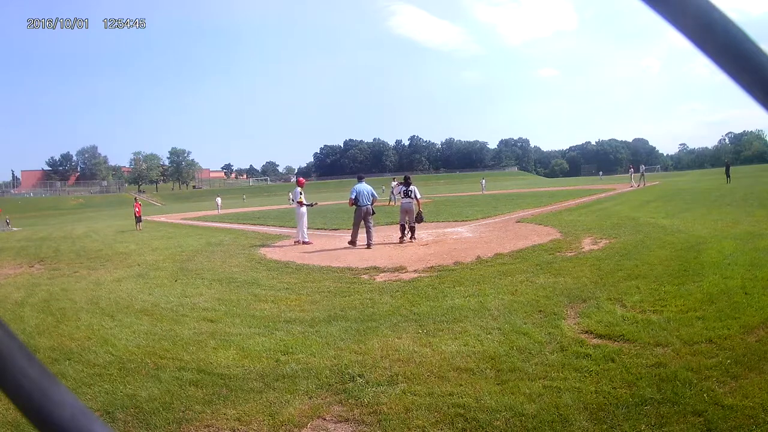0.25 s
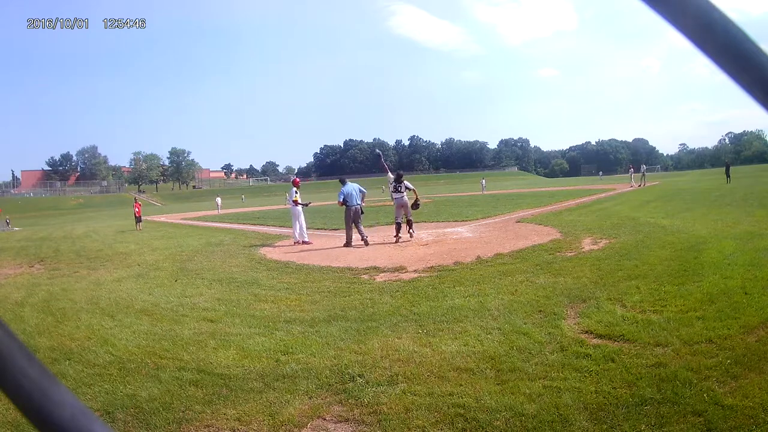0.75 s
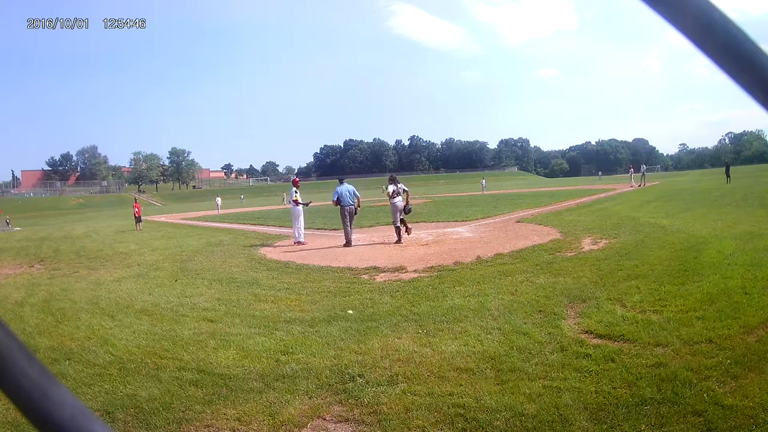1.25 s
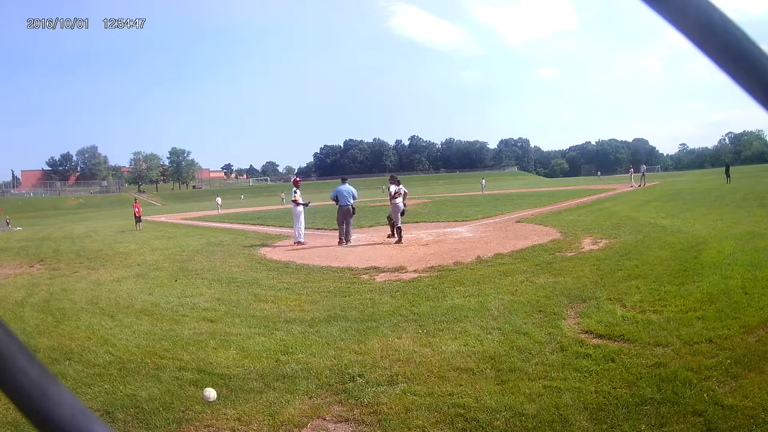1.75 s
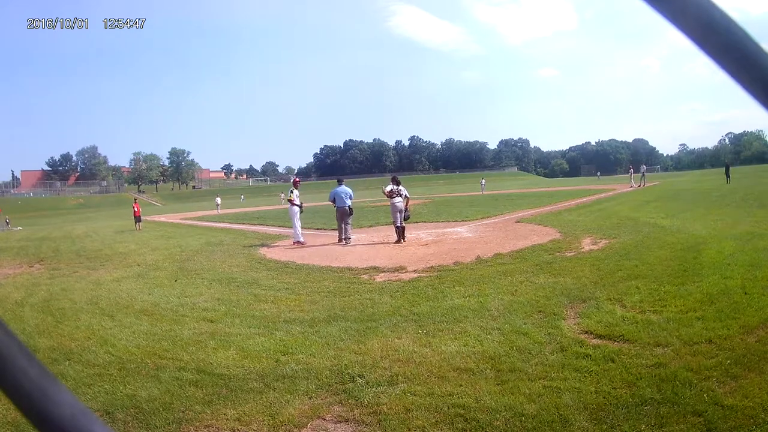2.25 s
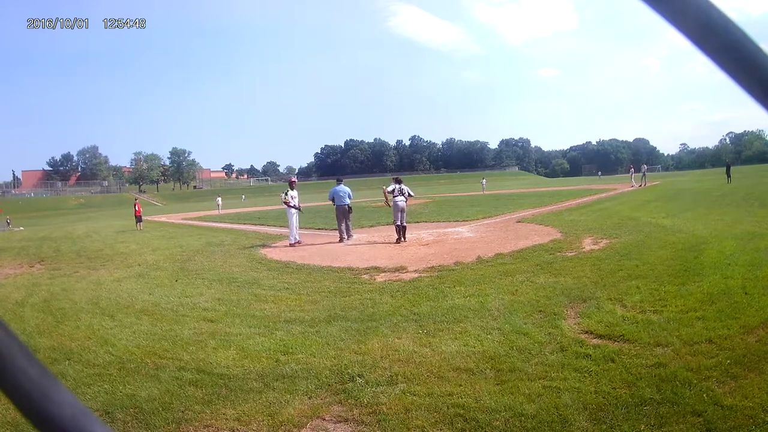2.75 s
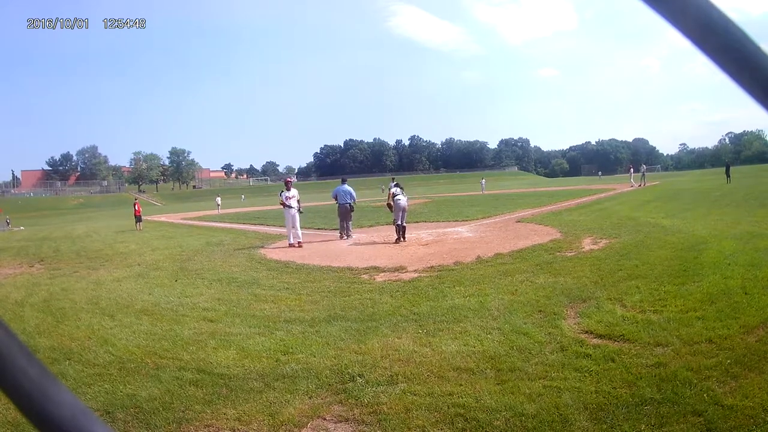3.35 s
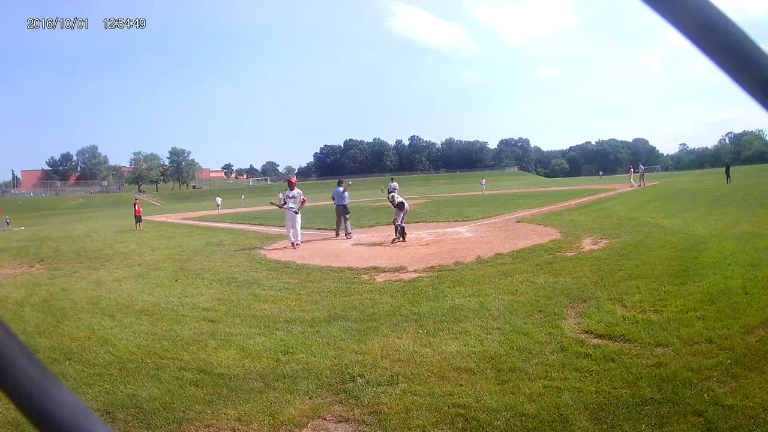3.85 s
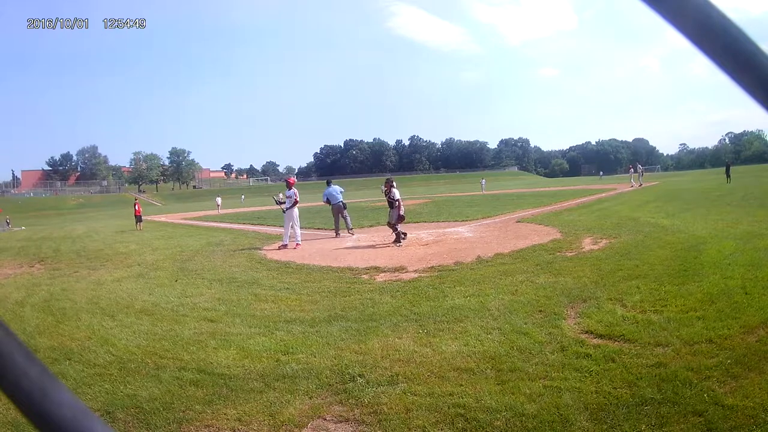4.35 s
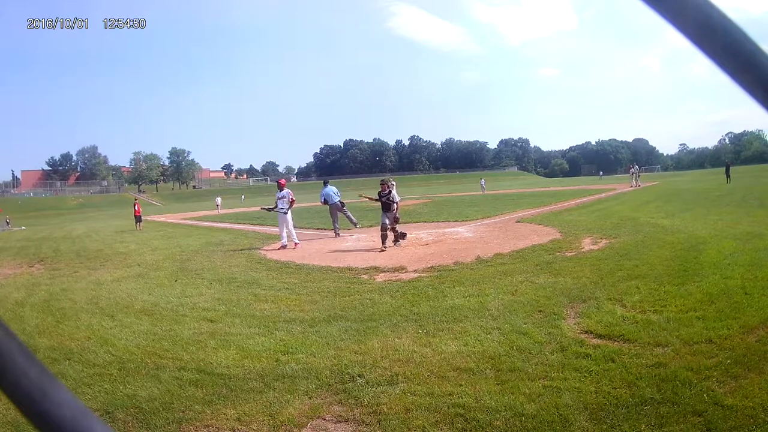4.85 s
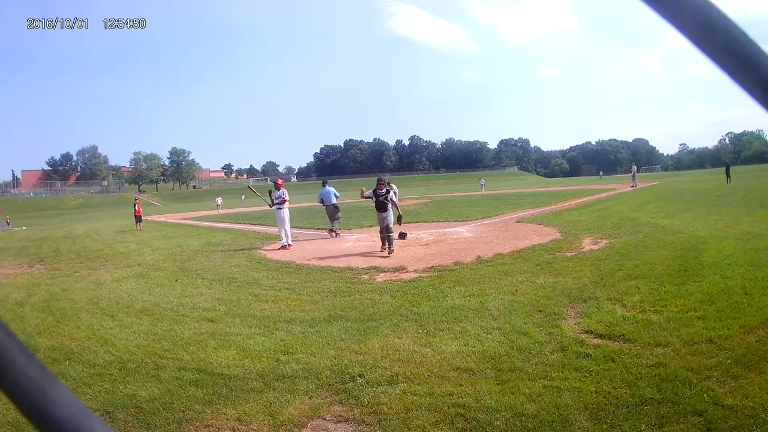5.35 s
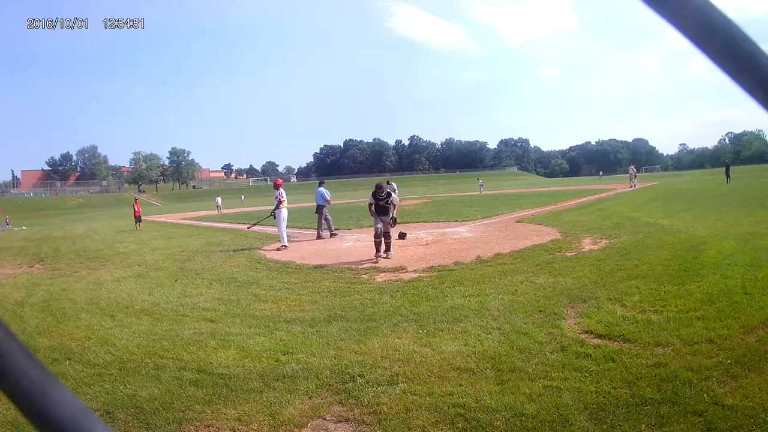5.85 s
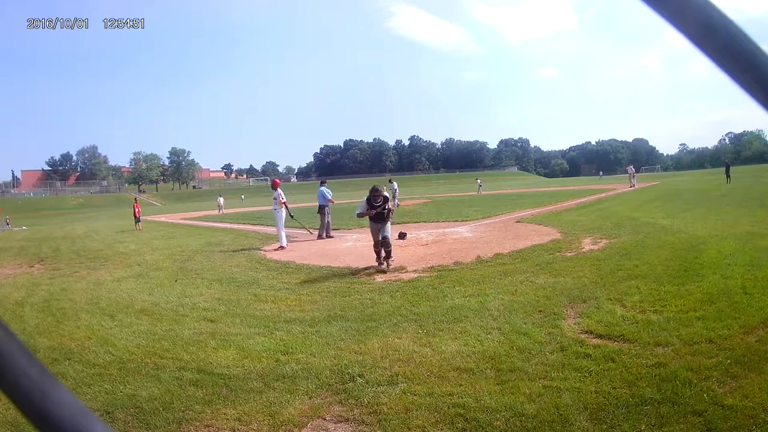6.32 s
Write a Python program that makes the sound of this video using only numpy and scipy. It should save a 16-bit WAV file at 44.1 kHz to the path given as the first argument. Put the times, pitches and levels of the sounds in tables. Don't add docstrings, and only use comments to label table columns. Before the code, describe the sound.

Outdoors at a ballfield, a camera fixed to the backstop picks up faint air, hiss and small wind puffs for two seconds. A ball then hits the chain-link very close, overloading the microphone with a harsh metallic crash. The mesh rattles and rings, loose links tick and jingle, and the pipe frame hums low in swells as everything fades.

```python
import sys
import numpy as np
from scipy import signal
from scipy.fft import rfft, irfft, next_fast_len
from scipy.io import wavfile
from scipy.ndimage import uniform_filter1d, map_coordinates

SR = 44100
rng = np.random.default_rng(int(sys.argv[2]) if len(sys.argv) > 2 else 0)


def ratio_of_db(decibels):
    return 10 ** (np.asarray(decibels, float) / 20)


def to_wav(s):
    ch = np.atleast_2d(s).T
    pcm = np.round(np.clip(ch, -1, 1) * 32767)
    wavfile.write(sys.argv[1], SR, pcm.astype(np.int16))


N = 290398
BLOW_S = 2.122


def unit(x):
    return x / np.sqrt(np.mean(x ** 2) + 1e-20)


def curves(rows):
    s, *cols = np.transpose(rows)
    return [np.interp(np.arange(N) / SR, s, c) for c in cols]


def wobble(rate):
    knots = rng.standard_normal(int(N * rate / SR) + 4)
    return map_coordinates(knots, [np.arange(N) * rate / SR])


def filtered(x, response):
    m = next_fast_len(N + SR // 2)
    return irfft(rfft(x, m) * response(np.fft.rfftfreq(m, 1 / SR)), m)[:N]


def coloured(x, spectrum):
    f, db = np.transpose(spectrum)
    return unit(filtered(x, lambda hz: ratio_of_db(np.interp(np.log(hz + 1), np.log(f + 1), db))))


def patchy(depth_db):
    z = signal.stft(rng.standard_normal(N), nperseg=1024)[2]
    patches = uniform_filter1d(rng.standard_normal(z.shape), size=5, axis=0)
    patches = uniform_filter1d(patches, size=3, axis=1)
    return signal.istft(z * ratio_of_db(depth_db * unit(patches)), nperseg=1024)[1][:N]


# frequency in Hz, level in dB per Hz.
AIR_COLOUR = [(12, -26.5), (20, 3.5), (54, -3.5), (76, -0.5), (160, -2.5), (343, -7.5), (625, -12.5),
              (970, -15.5), (1170, -17), (5000, -28.5), (6500, -61.5), (11000, -120)]
# frequency in Hz, level in dB per Hz.
HISS_COLOUR = [(2940, -32), (5000, -3.5), (5630, -4), (7570, -1), (9270, -4), (10800, -5), (12700, -2),
               (14400, 0), (15100, -0.5), (15400, -3.5)]
# time in seconds, strength in dB.
BREEZE = [
    (0, -78),
    (.45, -75),
    (.9, -82),
    (1.1, -70),
    (1.36, -72),
    (1.41, -59),
    (1.6, -77),
    (1.75, -63),
    (2.05, -67),
]


def field():
    air = ratio_of_db(-64.5 + .6 * wobble(5.1)) * coloured(rng.standard_normal(N), AIR_COLOUR)
    hiss = ratio_of_db(-75) * coloured(patchy(depth_db=3.0), HISS_COLOUR)
    tone = ratio_of_db(-83) * np.sin(2 * np.pi * 941 * np.arange(N) / SR)
    stir = coloured(rng.standard_normal(N), [(50, -37.5), (68, 7.5), (95, 19.0), (130, -40)])
    wind = ratio_of_db(curves(BREEZE)[0] + 1.5 * wobble(8)) * stir
    return air + hiss + tone + wind


def bells(rows):
    s, height, half = np.transpose(rows)[:, :, None]
    ms = np.arange(0, N / SR + 1, 1 / 1000)
    return np.interp(np.arange(N) / SR, ms, np.sum(height * np.exp(-.5 * ((ms - s) / half) ** 2), axis=0))


def fade(start_db, loss_db, knee_s):
    return start_db - loss_db * np.log10(1 + np.maximum(np.arange(N) / SR - BLOW_S, 0) / knee_s)


def resonance(hz, centre, width):
    return 1j * hz * width / (centre * centre - hz * hz + 1j * hz * width)


# time in seconds, peak level in dB.
TICKS = [(2.2657, -32), (2.3534, -44), (2.4169, -41), (2.4833, -46), (2.5456, -43), (2.5691, -41),
         (2.6813, -43), (2.796, -51), (2.8814, -50), (2.9233, -52), (3.0395, -53), (3.0699, -50),
         (3.1228, -52), (3.1762, -51), (3.2056, -53), (3.2286, -56), (3.3707, -54), (3.5758, -61),
         (3.7658, -60), (3.7943, -61), (4.0028, -56), (4.0841, -57), (4.1111, -55), (4.3959, -61),
         (4.567, -61), (4.8234, -60), (4.9107, -56), (5.7324, -61), (5.883, -66), (6.1594, -66)]
# time in seconds, lift in dB, half length in seconds.
FLURRIES = [
    (2.413, 0.5, 0.015),
    (2.498, 3.5, 0.013),
    (2.57, 2.5, .03),
    (2.903, 3, 0.047),
    (3.3, 3, 0.03),
    (3.65, 6, .04),
    (4.04, 1.5, .04),
    (4.17, 15, 0.014),
    (5.05, 1.5, .15),
]


def ticks():
    bright, dull = np.zeros(N + SR), np.zeros(N + SR)
    draw = rng.random((150, 4))
    gap_s, share, spread_db = .028, .5, 6
    times = np.minimum(BLOW_S + 0.12 + gap_s * np.cumsum(.5 + draw[:, 0]), (N - 1) / SR)
    level_db = fade(start_db=-42, loss_db=22, knee_s=.15) + bells(FLURRIES)
    levels = level_db[(times * SR).astype(int)] + spread_db * (2 * draw[:, 1] - 1)
    faint = np.c_[times, levels, 9 * draw[:, 2] - 2][draw[:, 3] < share]
    creak = (.87, -72, 6)
    clear = [(s, db, 5) for s, db in TICKS]
    for s, db, knock_db in [creak, *clear, *faint]:
        snap, rebound = round(s * SR) + np.array([0, rng.integers(20, 70)])
        bright[snap] += ratio_of_db(db)
        bright[rebound] += ratio_of_db(db) * rng.uniform(-0.48, 0.54)
        dull[snap] += ratio_of_db(db + min(knock_db, 7))

    def band(centre, width):
        return lambda hz: resonance(hz, centre, width) ** 2 / (1 + (hz / 6200) ** 12)

    click = ratio_of_db(24) * filtered(bright[:N], band(5400, 1300))
    knock = ratio_of_db(26) * filtered(dull[:N], band(3600, 3000))
    return click + knock


# frequency in Hz, level in dB, time in seconds to fall by 60 dB.
STRUCK = [(317.8, 0, .22), (751, -20.5, 0.19), (1254, -12.5, 0.29), (1334, -7, 0.52), (1437, -5, 0.44),
          (1484, -11.5, .45)]
# frequency in Hz, level in dB per Hz.
CRACK_COLOUR = [(2500, -19.5), (3300, -1.5), (4500, 7.5), (6300, 0), (7500, -20.5)]


def blow():
    t = np.maximum(np.arange(N) / SR - BLOW_S, 0)
    ring = np.zeros(N)
    for hz, db, t60 in STRUCK:
        drift = 0.47 * wobble(30)
        ring += ratio_of_db(db - 60 * t / t60) * np.sin(2 * np.pi * hz * t + drift)
    crack = ratio_of_db(-24.5 - 60 * t / 0.25) * coloured(rng.standard_normal(N), CRACK_COLOUR)
    return (ring + crack) * (1 - np.exp(-t / 0.0096))


def rattle(rate, spread_db, t60, depth):
    sizes = ratio_of_db(spread_db * np.minimum(rng.exponential(size=N), 3.5))
    hits = (rng.random(N) < rate / SR) * sizes * rng.standard_normal(N)
    t = np.arange(SR // 2) / SR
    modes = rng.standard_normal(len(t)) * ratio_of_db(-60 * t / t60)

    def response(hz):
        full = rfft(modes, 2 * len(hz) - 1)
        return full * np.abs(full) ** (depth - 1)

    return unit(filtered(hits, response))


# frequency in Hz, random scatter in Hz, level in dB.
PINGS = [(2526, 22, -5.5), (2885, 20, -4), (3230, 18, -1.5), (3490, 19, -4.5), (3520, 23, -4.5),
         (3390, 9.6, 2), (3460, 10, -0.5), (3560, 20, -11), (3755, 14, -4.5), (3835, 16, -8.5),
         (3930, 12, 0.5), (4030, 16, -0.5), (4190, 36, -4.5), (4430, 42, -7.5), (6300, 94, -23),
         (6734, 120, -21)]


def pings(count, t60):
    draw = rng.random((count, 4))
    centre, scatter, db = np.transpose(PINGS)[:, (draw[:, 0] * len(PINGS)).astype(int)]
    hz = (centre + scatter * (2 * draw[:, 1] - 1))[:, None]
    t = np.arange(SR // 12) / SR
    envelope = ratio_of_db(db[:, None] + 12 * draw[:, 2:3] - 60 * t / t60) * (1 - np.exp(-t / .006))
    notes = envelope * np.sin(2 * np.pi * hz * t)
    at = (draw[:, 3:] * N).astype(int) + np.arange(len(t))
    return unit(np.bincount(at.ravel(), notes.ravel())[:N])


# frequency in Hz, level in dB per Hz.
CRASH_COLOUR = [(210, -79.5), (350, -20.5), (430, -3.5), (460, -12.5), (546, -6), (590, -9.5), (743, -4.5),
                (816, -9.5), (952, -5.5), (1080, -9), (1510, -2.5), (1820, -16), (1980, -13.5), (2350, -23),
                (2700, -26.5), (3510, -53.5), (5940, -120)]
RING_COLOUR = [(210, -31.5), (350, -3.5), (456, -6), (570, -3.5), (665, -16.5), (730, -6), (823, -7),
               (1020, -2), (1180, -7.5), (1310, 0.5), (1580, -3), (1810, -19.5), (2000, -11.5),
               (2220, -23.5), (2700, -26), (3510, -57), (5940, -120)]
THUD_COLOUR = [(65, -34), (110, -9), (124, -6), (161, 1.5), (194, -6.5), (236, -5), (329, 1), (360, 2.5),
               (470, -26.5), (790, -120)]
DRONE_COLOUR = [(65, -24.5), (110, 4), (124, -0.5), (161, -5), (211, -13), (274, -12), (323, -9),
                (360, -12), (470, -14), (790, -120)]
LINK_COLOUR = [(1350, -16.5), (2300, -9), (2530, -8), (2900, -18), (3040, -9), (3250, 5.5), (3450, -1.5),
               (3730, 1), (4040, -2), (4680, -2.5), (4900, -16), (5050, -39), (5600, -29), (7280, -62.5),
               (12300, -120)]
# frequency in Hz, width in Hz, lift in dB.
WIRES = [(163.7, 5.5, 4), (330, 18, 2), (718, 29, 3.5), (1001, 5.3, 0), (1018, 17, 4.5), (1160, 20, 3),
         (1264, 9.5, 2), (1280, 49, 0), (1455, 19, 2), (1390, 29.34, 0.5), (1540, 14, 3.5), (1680, 30, 4),
         (1918, 16, 6), (2350, 20, 6.5)]


def mesh():
    share = np.clip(1 - np.exp(-(np.arange(N) / SR - 2.13) / 0.73), 0, 1)

    def lift(hz):
        return ratio_of_db(sum(db / (1 + (2 * (hz - c) / w) ** 2) for c, w, db in WIRES))

    def settle(x, early, late):
        return (1 - share) * coloured(x, early) + share * coloured(x, late)

    body = filtered(rattle(rate=3000, spread_db=2, t60=.12, depth=.2), lift)
    body = settle(body, CRASH_COLOUR, RING_COLOUR)
    thud = filtered(rattle(rate=1500, spread_db=2, t60=.12, depth=.2), lift)
    thud = settle(thud, THUD_COLOUR, DRONE_COLOUR) * np.clip(25 * share, .03, 1)
    links = coloured(rattle(rate=1500, spread_db=3, t60=.05, depth=.4), LINK_COLOUR)
    chatter = ratio_of_db(-3) * links + ratio_of_db(-4) * pings(count=1300, t60=.12)
    body_db = fade(start_db=-5, loss_db=33.23, knee_s=.15) + 0.26 * wobble(27)
    thud_db = fade(start_db=-9.5, loss_db=32.3, knee_s=0.16) + 2 * wobble(9)
    chatter_db = fade(start_db=-14, loss_db=37.93, knee_s=0.087) + bells(FLURRIES) + wobble(20)
    return ratio_of_db(body_db) * body + ratio_of_db(thud_db) * thud + ratio_of_db(chatter_db) * chatter


# frequency in Hz, width in Hz, half the level in dB (applied twice).
LASTING = [(1051, 130, 1), (1304, 81, -0.5), (3386, 160, -10)]


def lasting():
    def modes(hz):
        return sum(ratio_of_db(db) * resonance(hz, c, w) for c, w, db in LASTING) ** 2

    level = ratio_of_db(fade(start_db=-32.5, loss_db=20.4, knee_s=0.21))
    return level * unit(filtered(rng.standard_normal(N), modes))


# time in seconds, level in dB, half length in seconds.
SWELLS = [(2.16, -21, .025), (2.275, -24, 0.015), (2.372, -20, 0.013), (2.448, -18, 0.02),
          (2.55, -15.5, 0.025), (2.685, -26.5, 0.036), (2.879, -23.5, 0.03), (3.04, -26.5, 0.0088),
          (3.16, -33, .04), (3.38, -31, 0.021), (3.516, -33, 0.043), (3.642, -39.5, .025),
          (3.732, -36, 0.029), (3.955, -34, 0.054), (4.098, -38, .025), (4.201, -39, 0.038),
          (4.333, -35, 0.032), (4.496, -43, 0.034), (4.727, -41, 0.036), (4.862, -45, .025),
          (5.09, -43.5, 0.032), (5.299, -52.5, 0.026), (5.46, -46, .03), (5.567, -40, 0.06),
          (5.82, -42, 0.065), (6.072, -50, 0.023), (6.303, -53.5, 0.066), (6.433, -48, .03),
          (6.55, -45, 0.027)]
# frequency in Hz, level in dB per Hz.
SWAY_COLOUR = [(12, -35.5), (28, 4), (52, 10.5), (75, 17.5), (105, 4.5), (135, -4), (170, -57)]


def frame():
    t = np.maximum(np.arange(N) / SR - BLOW_S, 0)
    rest_hz, taut_hz, slack_s = 74.4, 11, .3
    hum_hz = rest_hz + taut_hz / (1 + (t / slack_s) ** 8)
    hum_hz = hum_hz * (1 + 0.05 * wobble(17))
    hum = np.sqrt(2) * np.sin(2 * np.pi * np.cumsum(hum_hz) / SR)
    swell = bells([(s, ratio_of_db(db), half) for s, db, half in SWELLS])
    swell = swell + ratio_of_db(fade(start_db=-33, loss_db=20, knee_s=.2))
    sway = coloured(rng.standard_normal(N), SWAY_COLOUR)
    posts = ratio_of_db(fade(start_db=-20.5, loss_db=24.6, knee_s=0.28) + 2 * wobble(6))
    return (1 - np.exp(-t / 0.031)) * (swell * hum + posts * sway)


# time in seconds, level in dB.
BLOW_RISE = [
    (2.093, -77),
    (2.1, -29.5),
    (2.117, -26),
    (2.121, -21.5),
    (2.126, 1),
]


def scene():
    fence = ratio_of_db(curves(BLOW_RISE)[0]) * (mesh() + lasting())
    return (fence + blow() + frame() + ticks() + field())[None]


# frequency in Hz, level in dB per Hz.
GRIT_COLOUR = [(3060, -27.5), (5200, 1.5), (5980, -8.5), (6880, -5.5), (7810, -9), (8740, -6.5),
               (9440, -8.5), (14200, -6), (15300, -8.5)]


def grit(x):
    size, lead, step = 1024, 662, 6
    frames = np.pad(x, (lead, -(N + lead) % size)).reshape(-1, size)
    power = np.mean(frames ** 2, axis=1)
    seen = (power + np.roll(power, 1)) / 2 + .1 * np.roll(power, -1)
    level_db = 10 * np.log10(seen + 1e-12)
    overload = np.clip(8 * np.mean(np.abs(frames) > .99, axis=1), 0, 1)
    step_db = step * np.round(level_db / step) + 4.5 * overload
    gain_db = np.repeat(step_db, size)[lead:][:N]
    return ratio_of_db(-39 + gain_db) * coloured(patchy(depth_db=4), GRIT_COLOUR)


def top_cut(x):
    return signal.sosfilt(signal.butter(12, 15570, fs=SR, output="sos"), x)


def record(dry):
    x = np.clip(dry[0], -.995, .995)
    mix = filtered(x + grit(x), lambda hz: ratio_of_db(-14 / (1 + np.exp(-(hz - 15100) / 150))))
    return top_cut(mix[None])


dry = scene()
out = record(dry)
to_wav(out)
```